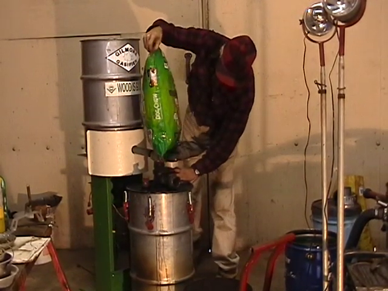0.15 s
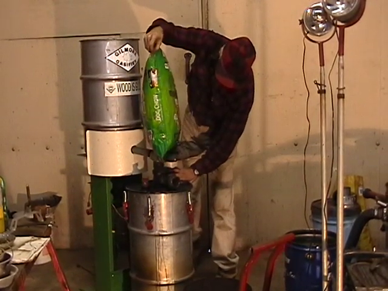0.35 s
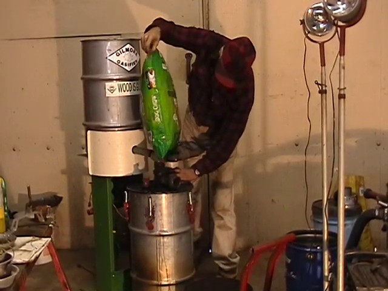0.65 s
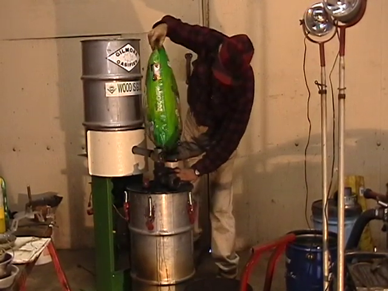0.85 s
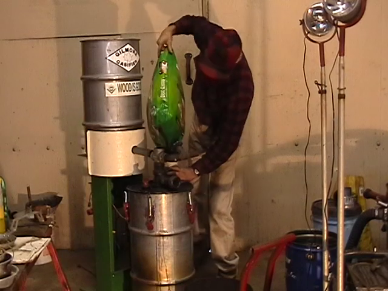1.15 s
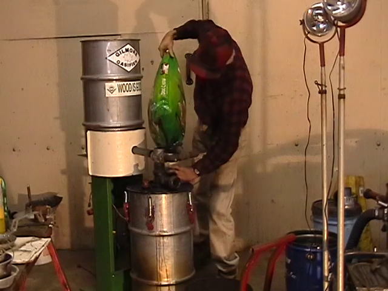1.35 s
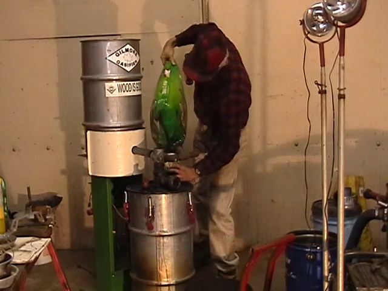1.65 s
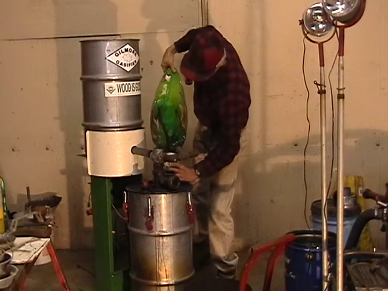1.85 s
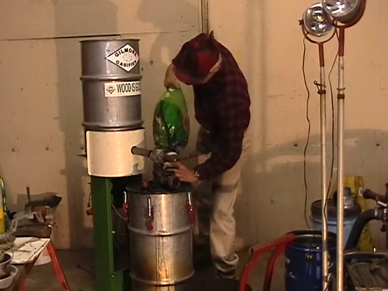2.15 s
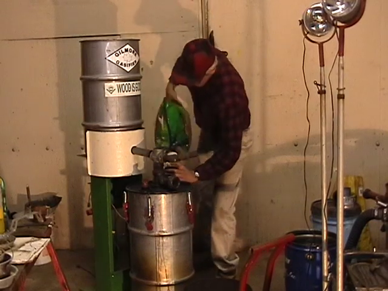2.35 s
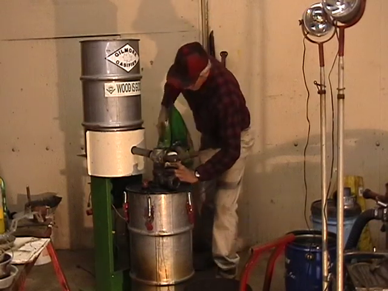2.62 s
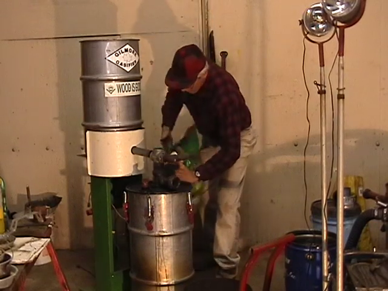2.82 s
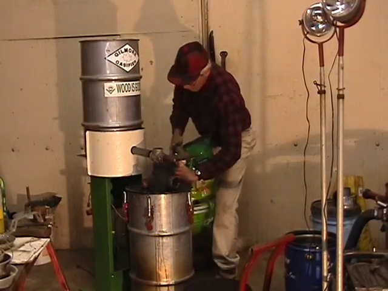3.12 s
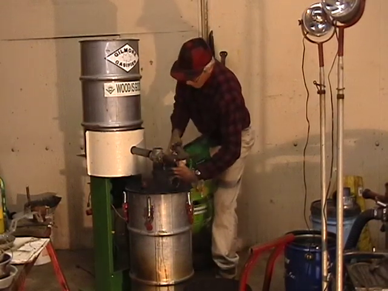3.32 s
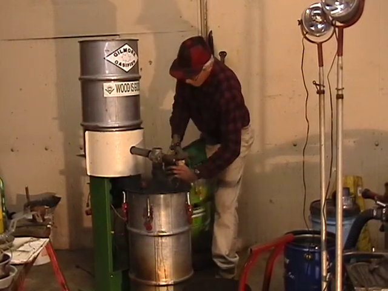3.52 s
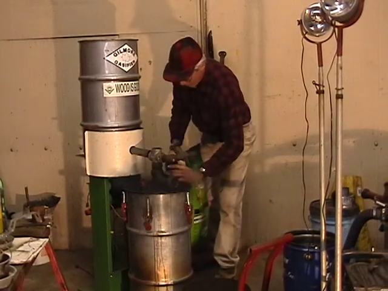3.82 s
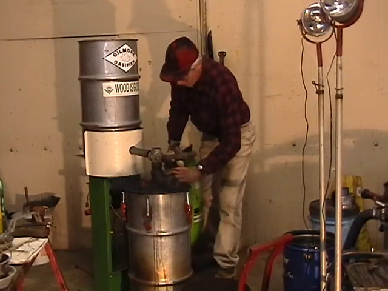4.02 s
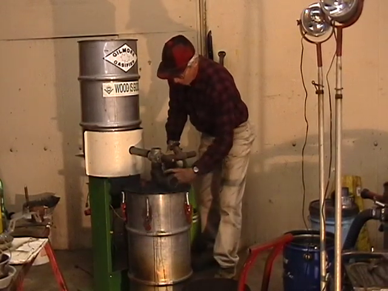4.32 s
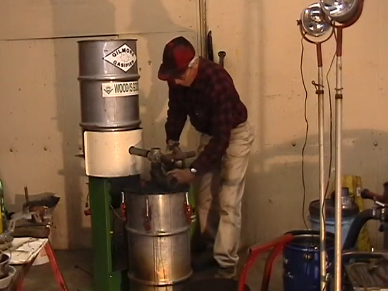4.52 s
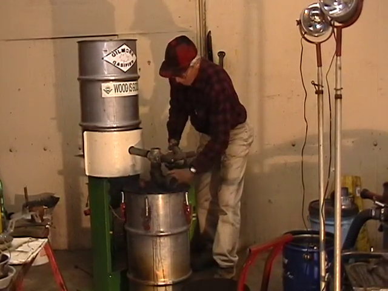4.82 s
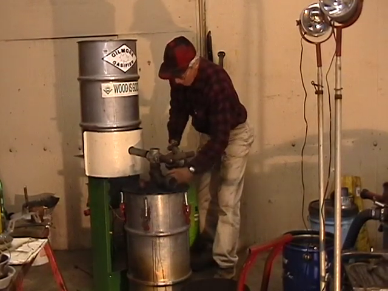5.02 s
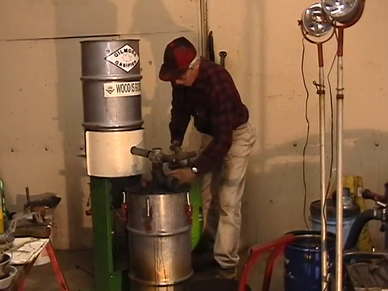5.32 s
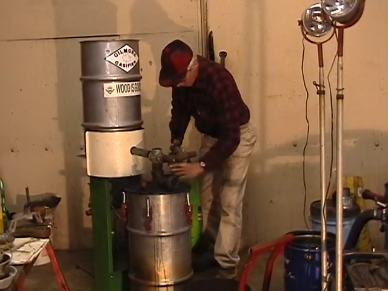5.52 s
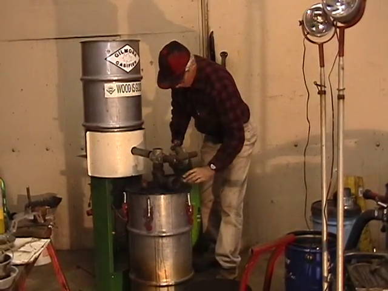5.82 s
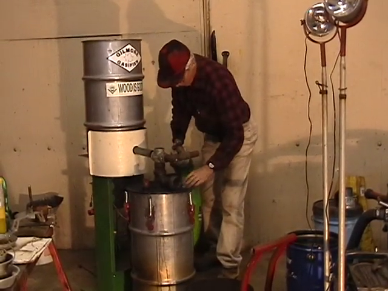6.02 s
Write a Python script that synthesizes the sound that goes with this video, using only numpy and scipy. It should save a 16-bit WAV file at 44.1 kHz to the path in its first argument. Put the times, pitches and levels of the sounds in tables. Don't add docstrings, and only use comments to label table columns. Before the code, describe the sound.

Charcoal lumps trickle, then pour in clattering surges from a crackling plastic bag into a booming steel barrel, over a faint low hum.

```python
import sys
import numpy as np
from scipy import signal
from scipy.fft import rfft, irfft
from scipy.io import wavfile
from scipy.ndimage import uniform_filter1d

SR = 44100
rng = np.random.default_rng(int(sys.argv[2]) if len(sys.argv) > 2 else 0)


def file_out(sig):
    cols = np.atleast_2d(sig).T
    lim = np.clip(cols, -1, 1)
    pcm = np.round(lim * 32767).astype(np.int16)
    wavfile.write(sys.argv[1], SR, pcm)


def level_to_linear(level):
    exponent = np.asarray(level, float) / 20
    return 10 ** exponent


N = 271656


def evened(x):
    return x / np.sqrt(np.mean(x ** 2) + 1e-20)


def read(points, hz):
    f, value = np.transpose(points)
    return np.interp(np.log(hz + 1), np.log(f + 1), value)


def curve(rows, axis):
    rows = np.array(rows)
    return np.interp(np.arange(N) / SR, rows[:, 0], rows[:, axis])


def tinted(x, spectrum):
    z = rfft(x)
    mean = np.sqrt(uniform_filter1d(abs(z) ** 2, size=1500) + 1e-20)
    wanted = level_to_linear(read(spectrum, np.fft.rfftfreq(len(x), 1 / SR)))
    return evened(irfft(z / mean * wanted, len(x)))


def ring(x, modes):
    out = np.zeros(len(x))
    for k, (hz, width, db) in enumerate(modes):
        r = np.exp(-np.pi * width / SR)
        turn = 2 * np.pi * hz / SR
        tone = signal.lfilter([1, 0, -1], [1, -2 * r * np.cos(turn), r * r], x)
        out += (-1) ** k * level_to_linear(db) * (1 - r) * tone
    return out


def glide(x, hz, width):
    turn = np.exp(2j * np.pi * np.cumsum(hz) / SR)
    r = np.exp(-np.pi * width / SR)
    smooth = signal.lfilter([1 - r], [1, -r], x / turn)
    smooth = signal.lfilter([1 - r], [1, -r], smooth)
    return evened((turn * smooth).real)


def grains(per_s, spread_db, lo_hz, hi_hz, cycles, count=24):
    size = level_to_linear(spread_db * np.minimum(rng.exponential(1, N), 5))
    size *= rng.random(N) < per_s / SR
    size *= rng.choice([-1, 1], N)
    kind = rng.integers(0, count, N)
    out = np.zeros(N)
    t = np.arange(2048) / SR
    for k, hz in enumerate(np.geomspace(lo_hz, hi_hz, count)):
        shape = np.sin(2 * np.pi * hz * t) * np.exp(-t * hz / cycles)
        out += signal.oaconvolve(size * (kind == k), shape / np.linalg.norm(shape))[:N]
    return out


def swells(peak_s, peak_db, rise_s, fall_s):
    at = np.arange(0, N + 64, 64)
    late = at / SR - peak_s[:, None]
    span = np.maximum(np.where(late < 0, rise_s[:, None], fall_s[:, None]), .005)
    slope_db = 20
    power = (level_to_linear(peak_db[:, None] - slope_db * abs(late) / span) ** 2).sum(0)
    return np.interp(np.arange(N), at, np.sqrt(power))


# (time of peak [s], boom level [dB], frame thump level [dB], build-up [s])
LOADS = [(.17, -58, -49, .12), (.4, -54, -54, .12), (.53, -50, -52, .05), (0.862, -45.5, -49, 0.077),
         (1.69, -42, -51, 0.14), (1.85, -41, -59, .15), (1.97, -41, -52, .1), (2.16, -42, -67, 0.28),
         (2.58, -32.5, -65, .06), (2.74, -32, -69.5, 0.11), (2.87, -28.5, -34, 0.095),
         (2.96, -29, -50, 0.051), (3.1, -43, -48, .12), (3.22, -40, -45, .2), (3.31, -42, -49, 0.1),
         (3.43, -46, -49, .15), (3.61, -38.5, -48, 0.074), (4.07, -52, -52, .15), (4.37, -56, -51, .1),
         (4.63, -29, -48, 0.089), (4.77, -20, -44, 0.1), (4.93, -24, -47, 0.16), (5.13, -23, -51, 0.026),
         (5.25, -23, -36, 0.14), (5.58, -34, -39, 0.071), (5.63, -46, -43, 0.1), (5.75, -46, -35.5, 0.11),
         (6.16, -37.5, -40, 0.088)]


def shaking(axis):
    rows = np.transpose(LOADS)
    return swells(rows[0], rows[axis], rows[3], 1.92 * rows[3])


# (frequency [Hz], level per Hz [dB])
ROOM_TONE = [(12, -54), (20, -14), (96, -59), (123, 8), (150, -24), (177, -40), (203, 9), (301, -31),
             (484, -2.5), (1800, -11.5), (9620, -21), (14200, -30.5), (15900, -61)]


def room_air():
    return level_to_linear(-56.5) * tinted(rng.standard_normal(N), ROOM_TONE)


def frame():
    thump = tinted(rng.standard_normal(N), [(15, -30), (40, 16.5), (60, 16.5), (105, 21.5), (140, -39)])
    shove = tinted(rng.standard_normal(N), [(8, -6), (22, 8), (40, -5.5), (60, -76)])
    shove = shove * (np.arange(N) > 4.9 * SR)
    rest_db = -59.5
    return level_to_linear(-6.0) * np.hypot(level_to_linear(rest_db), shaking(axis=2)) * (thump + 1.36 * shove)


def transformer():
    return level_to_linear(-44) * np.sin(2 * np.pi * 149.8 * np.arange(N) / SR)


# (time [s], pitch [Hz], level [dB])
MOTOR_RUN = [
    (.2, 98, -71),
    (.5, 106, -62),
    (.9, 116, -60),
    (1.4, 121, -65),
    (1.7, 122, -76),
]


def motor():
    turns = np.cumsum(curve(MOTOR_RUN, axis=1)) / SR
    return np.sin(2 * np.pi * turns) * level_to_linear(curve(MOTOR_RUN, axis=2))


# (time [s], level of knocking lumps [dB], chips and dust compared with lumps [dB])
TRICKLE = [(0, -33.5, -14), (.29, -74, -15), (.72, -50, -2.5), (.92, -41, -3), (1.3, -43.5, -11.5),
           (1.46, -43.5, -16), (1.6, -35, -14), (1.93, -45.5, -17), (2.16, -34.5, -10), (2.82, -24.5, -8.5),
           (3.06, -32.5, -7.5), (3.58, -43, -9.5), (3.88, -49, -10), (4.52, -46.5, -8.5),
           (4.62, -28, -18.5), (5.06, -41, -21), (5.6, -54, -19.5), (6.09, -79, -27.5)]
# (time of peak [s], peak level [dB], build-up [s], dying [s])
SLIDES = [(.02, -37.5, 0.14, 0.5), (.16, -39.5, 0.33, 0.05), (.4, -45, 0.029, 0.26),
          (.53, -44, 0.036, 0.13), (1.49, -37.5, 0.018, 0.079), (1.688, -31.5, 0.19, 0.68),
          (1.97, -30, 0.062, 0.063), (2.09, -27.5, 0.05, 0.088), (2.39, -29, 0.78, 0.14),
          (2.55, -25.5, 0.13, .07), (2.62, -31, .1, .2), (2.739, -19, 0.23, 0.24), (2.89, -15, 0.24, 0.19),
          (3.2, -29.5, 0.81, 0.08), (3.32, -31.5, .15, 0.34), (3.77, -38, 1, 0.22), (3.91, -36, 0.029, 0.1),
          (4.07, -35.5, 0.15, 0.14), (4.33, -46, 0.23, 0.13), (4.45, -39, 0.16, 0.12),
          (4.589, -28, 0.031, 0.45), (4.71, -20.5, 0.05, 0.97), (4.88, -16, 0.13, 0.3),
          (5.13, -22.5, 0.035, 0.42), (5.229, -19, 0.17, 0.27), (5.53, -39.5, 0.21, 0.13),
          (5.73, -50, 0.16, 0.11), (5.86, -60, .2, 0.1), (6.16, -44.5, 0.085, .1)]


def flow():
    return np.hypot(level_to_linear(curve(TRICKLE, axis=1)), swells(*np.transpose(SLIDES)))


# (frequency [Hz], level per Hz [dB])
KNOCK_COLOUR = [(150, -31), (250, -1.5), (291, -5.5), (334, -3.5), (504, -1.5), (887, -2), (1230, -8),
                (1480, -10.5), (3140, -20.5), (5000, -31.5), (6500, -82), (11000, -120)]
# (frequency [Hz], width [Hz], level [dB])
SHELL_RINGS = [(500, 13.3, 5), (570, 12, 38), (703, 30, 21.5), (850, 11, 16), (900, 24, -25),
               (1200, 14, -20)]
# (time [s], pitch [Hz], level compared with the knocks [dB])
HOLLOW_RING = [
    (0, 432, -11),
    (1.4, 450, -3),
    (2, 500, -4.5),
    (2.6, 514, -8.5),
    (3.2, 525, -12),
    (3.6, 556, -5),
    (4, 590, -20),
    (4.5, 514, -44),
    (5.3, 523, -8),
    (6.16, 480, -2),
]


def heap():
    knocks = tinted(grains(2000, 1.6, 313.6, 4080, cycles=1.75), KNOCK_COLOUR)
    shell = level_to_linear(-13.0) * evened(ring(knocks, SHELL_RINGS))
    hollow = glide(knocks, curve(HOLLOW_RING, axis=1), width=243)
    hollow = level_to_linear(curve(HOLLOW_RING, axis=2) - 6.0) * hollow
    return level_to_linear(-6.5) * flow() * (knocks + shell + hollow)


# (frequency [Hz], level per Hz [dB])
CRACKLE_COLOUR = [(880, -7), (1500, 2), (1960, -0.5), (3090, -3.5), (4980, -12), (5440, -10.5), (7440, -17),
                  (9490, -17.5), (12000, -24), (15600, -55), (22000, -120)]


def chips():
    colour = CRACKLE_COLOUR[:-2] + [(16000, -15.5)]
    crackle = tinted(grains(3000, 0.61, 1900, 13600, cycles=0.41), colour)
    return level_to_linear(curve(TRICKLE, axis=2) + 0.5) * flow() * crackle


# (frequency [Hz], width [Hz], level [dB])
BOOM_RINGS = [(123, 15, -11.5), (172.3, 13.3, 3), (191, 19, 4), (271, 103, 0), (363, 75, 1)]
# (time [s], level [dB])
BAG_BUMPS = [
    (5.551, -27),
    (5.746, -35),
    (5.808, -37),
]


def barrel():
    strength = np.hypot(level_to_linear(curve(TRICKLE, axis=1) - 14), shaking(axis=1))
    blows = grains(600, 2.76, 122.5, 445, cycles=0.97)
    boom = level_to_linear(-4.5) * strength * evened(ring(blows, BOOM_RINGS))
    t = np.arange(N) / SR
    for s, db in BAG_BUMPS:
        age = np.maximum(t - s, 0)
        fall = level_to_linear(db - 60 * age / 0.48)
        boom = boom + fall * (1 - np.exp(-age / 0.0058)) * np.sin(2 * np.pi * 168 * age)
    return boom


# (time [s], length [s], start pitch [Hz], end pitch [Hz], width [Hz], level [dB])
STEEL_SCRAPES = [
    (0.188, 0.036, 1480, 1700, 600, -46),
    (3.63, 0.06, 560, 705, 90, -44),
    (3.71, 0.096, 660, 740, 110, -45.5),
    (3.896, 0.088, 570, 623, 70, -46.5),
    (4.43, 0.075, 1230, 1350, 220, -46.5),
]


def scrapes():
    out = np.zeros(N)
    for s, length, from_hz, to_hz, width, db in STEEL_SCRAPES:
        n = round(length * SR)
        slips = rng.standard_normal(n) * (rng.random(n) < .06)
        squeak = glide(slips, np.linspace(from_hz, to_hz, n), width)
        out[round(s * SR):][:n] += level_to_linear(db) * squeak * signal.windows.tukey(n, .3)
    return out


def clatter(rows, peak_s, grit):
    out = np.zeros(N + 2048)
    t = np.arange(2048) / SR
    fade = np.exp(-t / peak_s)
    swing = t / peak_s * np.exp(1 - t / peak_s)
    noise = np.diff(uniform_filter1d(rng.standard_normal((len(rows), 2049)), size=3))
    for (s, db, hz), dirt in zip(rows, noise):
        tone = np.sin(2 * np.pi * hz * t) + 0.57 * np.sin(2 * np.pi * 1.61 * hz * t) * fade
        out[round(s * SR):][:len(t)] += level_to_linear(db - 4.0) * swing * (tone + grit * dirt * fade)
    return out[:N]


# (time [s], level [dB], pitch [Hz])
CHIP_CLICKS = [(0.2037, -44, 2760), (0.2346, -47, 2660), (0.3973, -35, 2637), (0.5639, -47, 2980),
               (0.9231, -34, 2720), (1.1286, -35, 2710), (1.2269, -34, 3110), (1.3566, -37, 3100),
               (1.5407, -36, 2870), (1.6913, -25, 3130), (1.7053, -30, 3040), (1.7617, -41, 3010),
               (1.7741, -39, 3080), (1.7816, -41, 2870), (1.839, -38, 2940), (1.9652, -37, 3110),
               (2.033, -36, 3520), (2.0939, -33, 3110), (2.1797, -32, 3140), (2.3319, -22, 2760),
               (2.3638, -25, 3390), (2.4182, -29, 3410), (2.5339, -31, 3060), (2.6885, -15, 3360),
               (2.7554, -19, 2580), (2.7778, -19, 2630), (2.7983, -18, 2770), (2.8168, -22, 3220),
               (3.0003, -23, 2980), (3.0896, -26, 3040), (3.1261, -27, 3820), (3.1844, -22, 3370),
               (3.3091, -28, 2890), (3.351, -30, 2660), (3.5621, -33, 2950), (3.6464, -30, 2900),
               (3.7641, -36, 2660), (3.826, -29, 3030), (3.9103, -31, 2780), (4.019, -31, 2830),
               (4.0275, -36, 3040), (4.4002, -41, 3260), (4.4461, -41, 2700), (4.5902, -31, 3040),
               (4.705, -30, 3050), (4.8102, -25, 3200), (4.9115, -20, 2920), (4.9494, -27, 2780),
               (4.9868, -30, 3150), (5.6314, -43, 4330), (5.6977, -41, 2500), (5.8115, -45, 2590),
               (5.9461, -50, 4530), (5.9801, -50, 2790), (6.1477, -40, 2920)]


def chip_clicks():
    return clatter(CHIP_CLICKS, peak_s=0.0005, grit=0.99)


# (time [s], level [dB], pitch [Hz], time to die by 60 dB [s])
SINGLE_LUMPS = [(0.3845, -20, 824, 0.022), (0.4, -24, 1150, 0.028), (0.4065, -23.5, 1310, 0.03),
                (0.424, -29, 1500, 0.03), (0.5166, -26, 412.4, 0.2), (0.627, -28.5, 476, 0.052),
                (0.848, -24, 436, 0.054), (0.952, -30, 1500, 0.03), (1.013, -28, 480, 0.04),
                (1.125, -25, 950, 0.057), (1.268, -26.5, 428, 0.064), (1.482, -18.5, 455, 0.066),
                (1.539, -32, 450, 0.084), (1.698, -20.5, 934, 0.11), (1.9618, -21, 480, 0.072),
                (2.078, -18.5, 550, 0.12), (2.132, -17, 500, 0.08), (2.201, -16, 510, 0.032),
                (2.267, -19, 558, 0.13), (2.716, -5, 605, 0.06), (3.181, -19, 546, 0.098),
                (3.6, -20, 356, 0.084), (3.6246, -21, 573, 0.068), (3.721, -21.5, 713, 0.083),
                (3.898, -22.5, 570, 0.14), (4.069, -29, 648, 0.1), (4.408, -26, 820, 0.04),
                (4.457, -30, 1270, 0.14), (4.699, -15, 496.7, 0.82), (4.8, -11, 494, 0.04),
                (5.076, -11, 387, 0.039), (5.377, -16, 588, 0.064), (6.01, -38, 1065, 0.042),
                (6.031, -28.5, 377, 0.031), (6.149, -28, 486, 0.11)]


def lumps():
    out = np.zeros(N + 8192)
    t = np.arange(8192) / SR
    for s, db, hz, t60 in SINGLE_LUMPS:
        fall = level_to_linear(-60 * t / max(t60, .01))
        tone = 0
        for m, g in [(1, 0.75), (1.13, 0.47), (1.65, 0.35), (2.45, 0.23)]:
            tone = tone + g * np.sin(2 * np.pi * hz * m * t) * fall ** m
        out[round(s * SR):][:len(t)] += level_to_linear(db - 7.5) * (1 - np.exp(-t / 0.0007)) * tone
    return out[:N]


# (time [s], level [dB], centre pitch [Hz], brightness [dB])
SHARP_TICKS = [(.3845, -30, 2380, -18.5), (0.519, -40, 1090, -26), (0.6265, -36.5, 1510, -12.5),
               (1.478, -33.5, 1540, -30), (1.531, -34.5, 1810, -13), (1.662, -26, 2810, -9.5),
               (1.9624, -33, 2290, -29), (2.678, -20.5, 2900, -6), (3.1767, -17.5, 1940, -12.5),
               (3.2938, -25.5, 2460, -17), (3.5616, -42, 3100, -7), (3.6882, -30.5, 2600, -12.5),
               (3.738, -46, 2600, -6), (3.815, -43, 3020, -8), (3.899, -25, 1610, -17),
               (4.3035, -36, 2040, -20), (4.3915, -44, 1850, -5), (4.4363, -50, 2700, -1),
               (4.5587, -33, 2710, -21), (4.576, -30, 1700, -24), (4.7102, -47, 3050, -3),
               (4.699, -25, 2020, -39), (4.8317, -18.5, 2830, -10), (4.873, -20, 1800, -31),
               (5.3, -32, 1700, -26), (5.808, -38.5, 2450, -33), (6.0112, -35.5, 1700, -29),
               (6.1404, -33, 2570, -11)]
# (time [s], level [dB], centre pitch [Hz], brightness [dB], rattle
# [dB])
VARIED_TICKS = [(.8112, -33.5, 2760, -5.5, -5), (1.133, -37.5, 1800, -11.5, 4.5),
                (1.697, -26.5, 1890, -35, -12), (2.019, -34, 1810, -7, -3),
                (2.2257, -29.5, 2320, -9.5, 2.5), (2.584, -21.5, 2280, -20, -3),
                (3.0827, -31, 1920, -14, 7), (3.3427, -25.5, 1978, -30, -19), (3.405, -30, 1800, -13, -2),
                (3.48, -27, 1580, -15, -11), (3.625, -27, 1100, -14.5, -5.5),
                (3.8253, -29.5, 3140, -26, -6), (4.011, -34.5, 1570, -14, 2),
                (4.044, -26.5, 1600, -37, -16), (4.0692, -28, 2390, -18, -9.5),
                (5.1263, -32, 2110, -23, 10), (5.695, -32, 1820, -33, -10),
                (5.7307, -24.5, 1750, -12.5, -48)]
# (frequency [Hz], level per Hz [dB])
DULL_COLOUR = [(500, -5), (1200, 8.5), (2500, 8), (4500, 0.5), (6000, -26)]
# (frequency [Hz], level per Hz [dB])
BRIGHT_COLOUR = [(3500, -1.5), (5000, 9), (10000, 3), (12500, -3), (16000, 7)]


def ticks():
    out = np.zeros(N + 8192)
    t = np.arange(8192) / SR
    dull = tinted(rng.standard_normal(N + len(t)), DULL_COLOUR)
    bright = tinted(rng.standard_normal(N + len(t)), BRIGHT_COLOUR)
    snap = level_to_linear(-60 * t / 0.046)
    crack = level_to_linear(10.0 - 60 * t / 0.0037)
    plain = [(*row, -10) for row in SHARP_TICKS]
    for s, db, hz, bright_db, rattle_db in plain + VARIED_TICKS:
        at = round(s * SR)
        rattle = level_to_linear(rattle_db - 60 * t / 0.69) * (1 - np.exp(-t / 0.0051))
        fall = snap + rattle
        burst = fall * dull[at:][:len(t)]
        burst = burst + level_to_linear(bright_db + 8.0) * (fall + crack) * bright[at:][:len(t)]
        tone = 1.2 * snap * np.sin(2 * np.pi * hz * t)
        out[at:][:len(t)] += level_to_linear(db - 13.5) * (burst + tone)
    return out[:N]


# (time [s], level [dB], pitch [Hz])
LUMP_KNOCKS = [(1.5422, -26, 480), (1.5856, -29, 570), (1.6006, -28, 430), (1.6335, -28, 470),
               (1.6635, -26, 477), (1.7782, -26, 666), (1.8326, -28, 540), (1.866, -28, 483),
               (1.9872, -27, 530), (2.0232, -31, 547), (2.0316, -30, 875), (2.0905, -22, 504),
               (2.098, -20, 520), (2.1504, -21, 570), (2.1718, -24, 580), (2.2871, -18.5, 700),
               (2.3285, -19, 540), (2.3514, -18, 510), (2.4018, -21, 600), (2.4447, -21, 560),
               (2.4746, -24, 624), (2.5505, -14.5, 714), (2.5968, -19, 697), (2.6283, -15, 530),
               (2.7435, -9, 650), (2.751, -6, 552), (2.8373, -12, 740), (2.8777, -10, 586),
               (2.8882, -10, 570), (2.9336, -11.5, 540), (3.0653, -17.5, 647), (3.0827, -21, 553),
               (3.1127, -19, 529), (3.208, -21, 597), (3.2688, -23.5, 556), (3.3087, -20.5, 543),
               (3.3616, -27, 780), (3.4414, -31, 684), (3.4818, -24, 520), (4.5624, -29, 815),
               (4.5883, -24, 715), (4.6252, -19.5, 730), (4.6412, -22, 570), (4.7061, -17, 745),
               (4.7135, -16, 547), (4.7724, -9, 525), (4.8218, -21, 520), (4.8338, -15, 890),
               (4.8752, -12, 616), (4.8846, -11, 600), (4.9061, -11.5, 715), (4.958, -14, 570),
               (5.0129, -21, 656), (5.0338, -24, 510), (5.0538, -29, 765), (5.1291, -23, 860),
               (5.2144, -7.5, 525), (5.412, -24, 520), (5.4559, -24, 510), (5.4938, -29, 596)]


def lump_knocks():
    return clatter(LUMP_KNOCKS, peak_s=0.0015, grit=0.072)


# (frequency [Hz], time to die by 60 dB [s])
ECHO_TIMES = [(150, 0.43), (600, 0.34), (1800, 0.18), (4600, 0.24), (12000, 0.15)]


def workshop(x, wet_db):
    taps = np.zeros((3, SR // 2))
    at = np.arange(160, SR // 2 - 20, 20)
    at = at + rng.integers(0, 20, (3, len(at)))
    np.put_along_axis(taps, at, rng.choice([-1., 1.], at.shape), 1)
    hz, t, z = signal.stft(taps, SR, nperseg=256)
    fall = level_to_linear(-60 * t / read(ECHO_TIMES, hz)[:, None])
    tail = signal.istft(z * fall, SR, nperseg=256)[1]
    phase = 5.3 * np.arange(N) / SR + np.arange(3)[:, None] / 3
    share = np.sqrt(2 / 3) * np.cos(2 * np.pi * phase)
    echoes = signal.fftconvolve(x * share, tail / np.linalg.norm(tail[0]), axes=1)[:, :N].sum(0)
    return x + level_to_linear(wet_db) * echoes


# (frequency [Hz], level [dB])
MIC_TREBLE = [(11500, 0), (12900, -9), (13600, -15), (14150, -14), (14700, -25), (16000, -20)]


def microphone(x):
    return irfft(rfft(x) * level_to_linear(read(MIC_TREBLE, np.fft.rfftfreq(N, 1 / SR))), N)


def scene():
    around = room_air() + frame() + transformer() + motor()
    snaps = ticks()
    pour = workshop(heap() + chips() + scrapes() + lumps() + 0.77 * snaps, wet_db=-5)
    pour = pour + .5 * snaps + barrel()
    pour = pour + workshop(chip_clicks() + lump_knocks(), wet_db=-8.5)
    pour = signal.sosfilt(signal.butter(2, 70, "high", fs=SR, output="sos"), pour)
    sound = microphone(pour) + around
    return np.array([0 * sound, 2 * sound])


# (frequency [Hz], level per Hz [dB])
HISS_COLOUR = [(20, 9), (200, 1), (2000, 1), (9000, -0.5), (13500, -4), (15000, -9), (15300, -17),
               (15830, -20), (16000, -60)]


def idle_channel(right):
    hiss = level_to_linear(-63.5) * tinted(rng.standard_normal(N), HISS_COLOUR)
    leak = -level_to_linear(-48) * np.r_[0, right[:-1]]
    whine = level_to_linear(-84) * np.sin(2 * np.pi * 9834 * np.arange(N) / SR)
    return hiss + leak + whine


# (multiple of the notch spacing [-], depth [dB])
HUM_NOTCHES = [(1, -8), (3, -8), (5, -10), (7, -10), (9, -10), (11, -9), (13, -12), (17, -12)]


def hum_filter(x):
    spacing_hz, width_hz = 299.7, 11
    hz = np.fft.rfftfreq(N, 1 / SR)
    depth = sum(db / (1 + ((hz - k * spacing_hz) / width_hz) ** 2) for k, db in HUM_NOTCHES)
    return irfft(rfft(x) * level_to_linear(depth), N)


def roll_off(x):
    return signal.sosfilt(signal.butter(12, 15830, fs=SR, output="sos"), x)


def record(dry):
    right = dry[1]
    mix = hum_filter(np.array([idle_channel(right), right]))
    return roll_off(np.clip(mix, -1, 1))


dry = scene()
out = record(dry)
file_out(out)
```